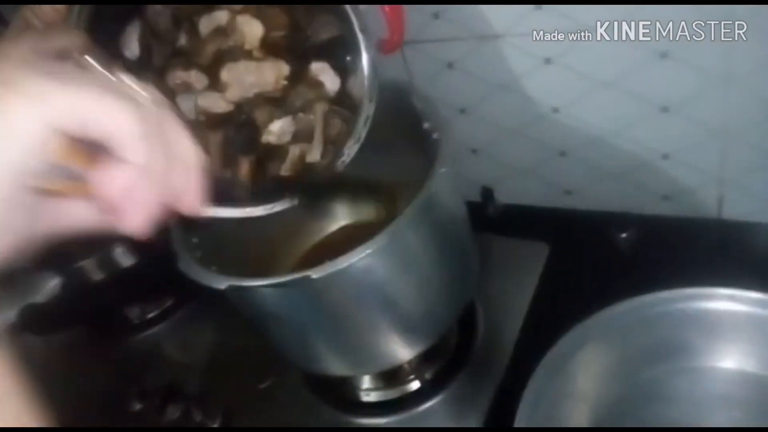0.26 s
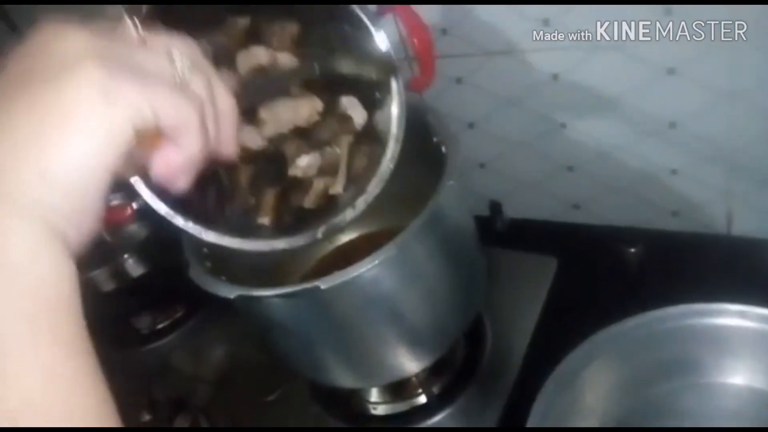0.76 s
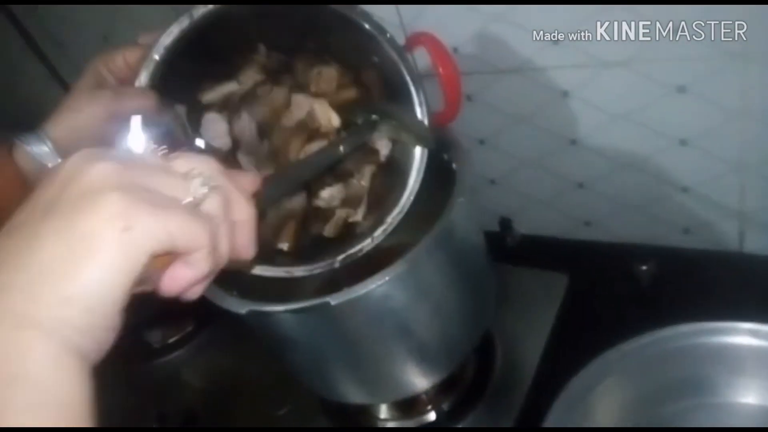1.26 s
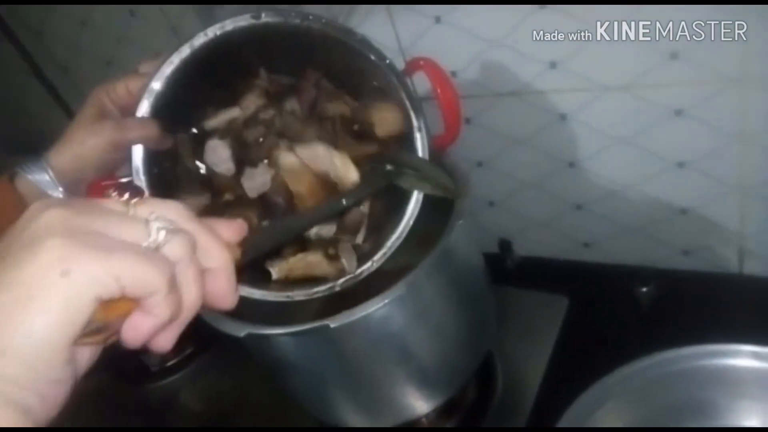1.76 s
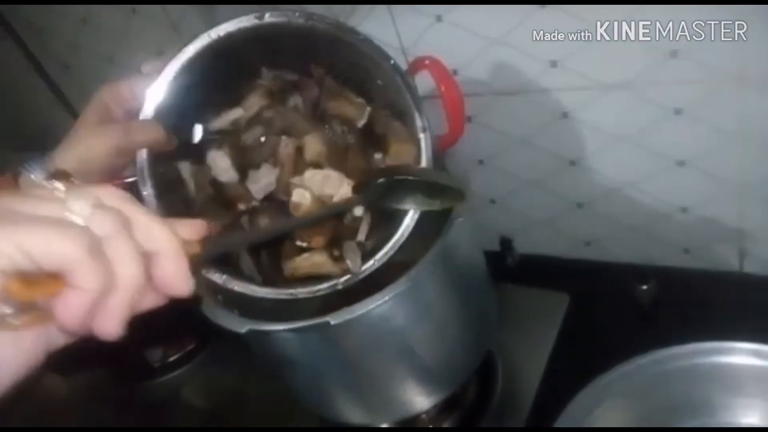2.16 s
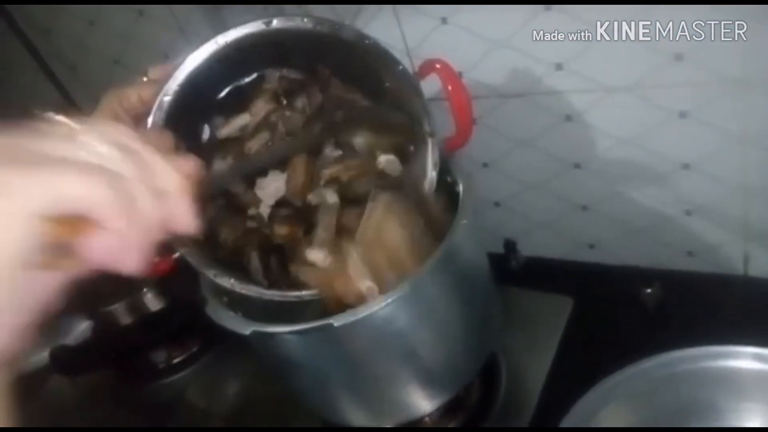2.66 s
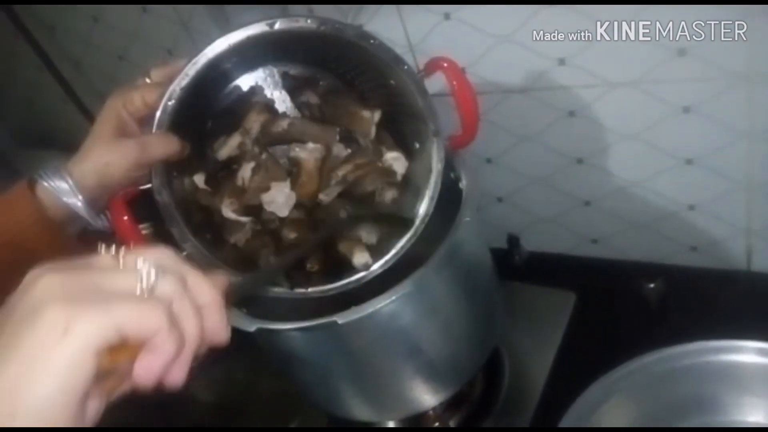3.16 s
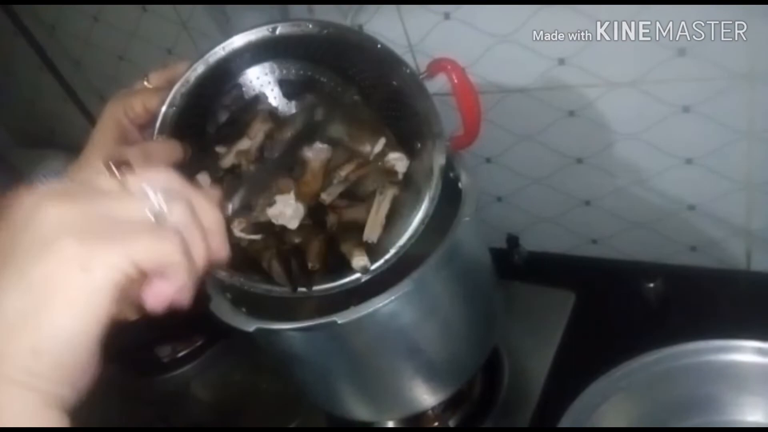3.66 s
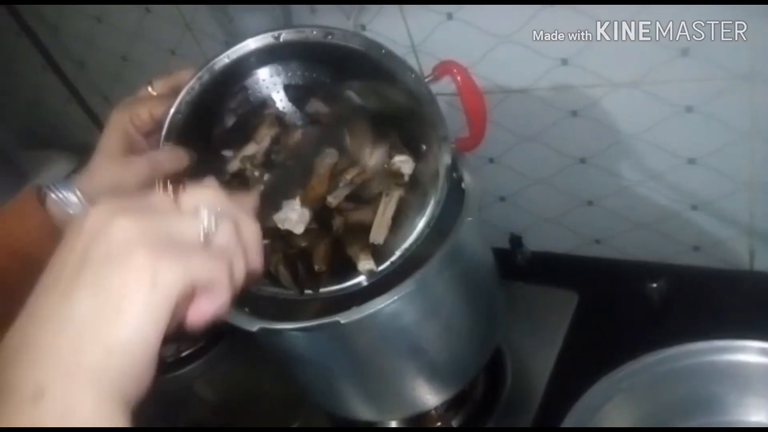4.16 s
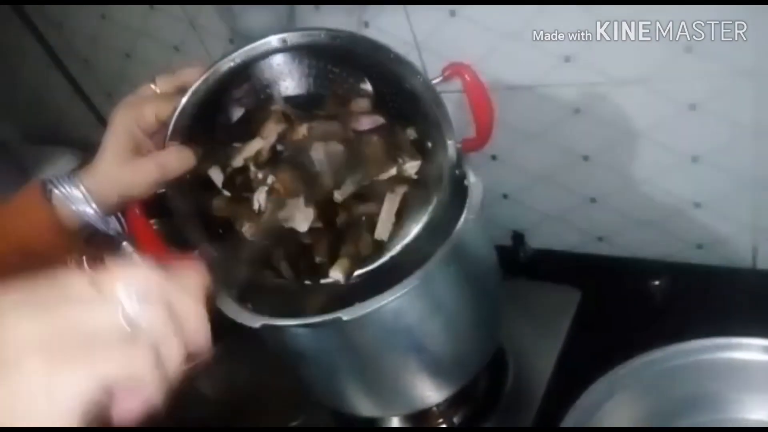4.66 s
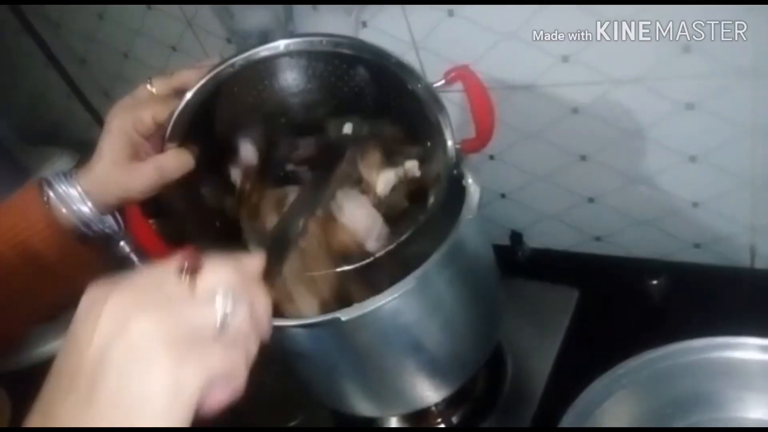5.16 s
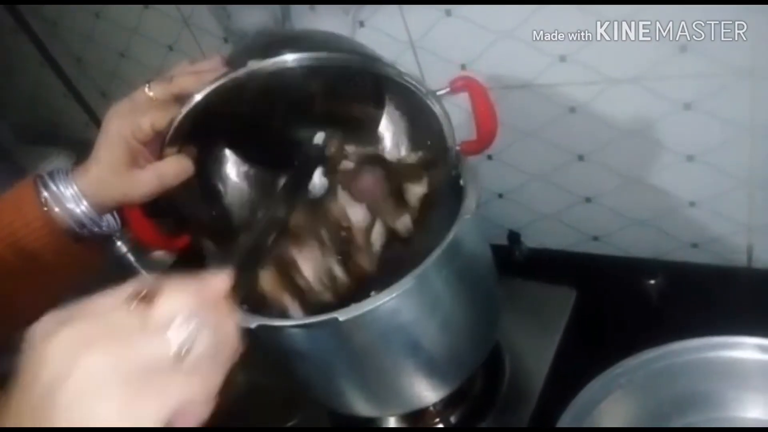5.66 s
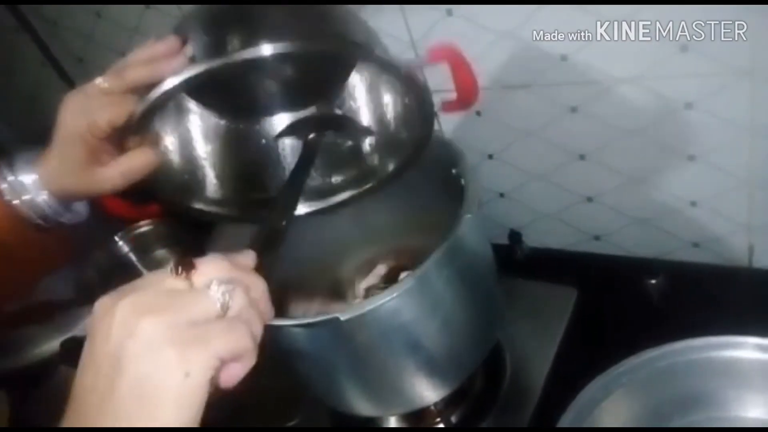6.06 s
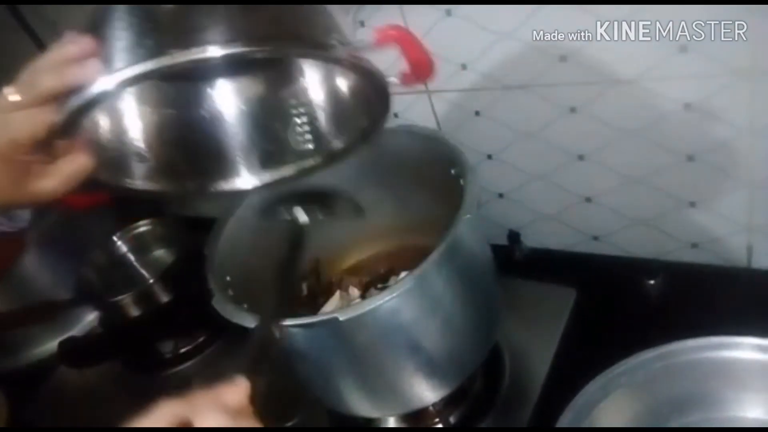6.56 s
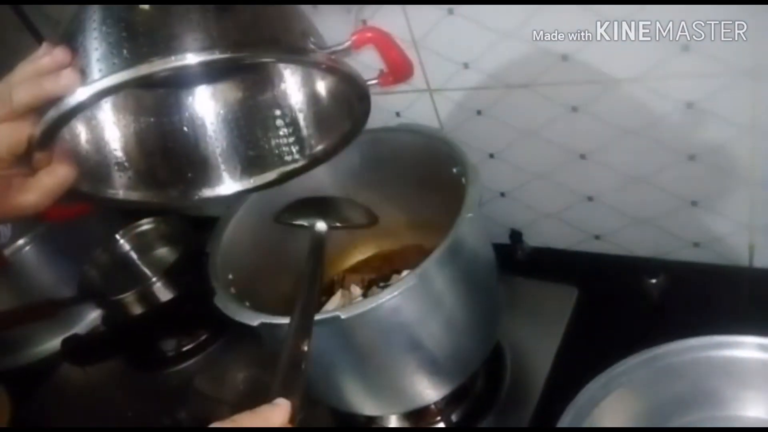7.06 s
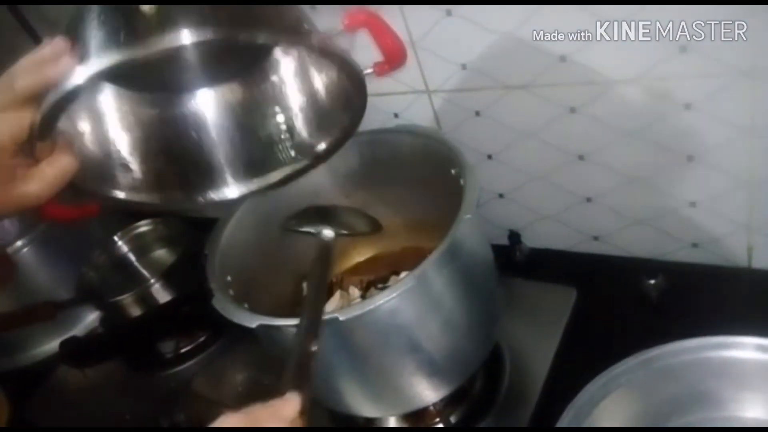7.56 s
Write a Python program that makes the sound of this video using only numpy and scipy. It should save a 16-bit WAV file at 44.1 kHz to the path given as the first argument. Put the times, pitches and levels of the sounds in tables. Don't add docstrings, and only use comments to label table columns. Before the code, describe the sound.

A small tiled kitchen, heard close through a modest microphone with light hiss; a low gas burner hum and very faint sizzle run throughout. At 0.25 s a hard bright ladle clank on the steel colander shimmers briefly, then a soft pot thud follows at 1.0. From 1.4 to 1.85 a dense flurry of knocks, rattle and scraping comes with hollow thumps as pieces drop. Light taps and quiet stirring follow around 2.0 to 2.6. A second burst at 2.7 to 3.2 booms low in the pot and ends with a clear ringing clang. Then mostly small wet ticks, with a dull thump at 3.9 and gentle stirring. From 4.9 activity returns; 5.15 to 5.55 is the longest tumble, clanging, ringing and thudding. A heavy dull thump lands at 5.87, smaller knocks last until 6.2, then faint stirring, ticks and hum to about 8 s.

```python
import sys
import numpy as np
from scipy import signal
from scipy.fft import rfft, irfft
from scipy.io import wavfile
from scipy.ndimage import uniform_filter1d

SR = 44100
rng = np.random.default_rng(int(sys.argv[2]) if len(sys.argv) > 2 else 0)


def persist_wave(psi):
    counts = np.round(np.clip(psi, -1, 1) * 32767).astype(np.int16)
    wavfile.write(sys.argv[1], SR, np.atleast_2d(counts).T)


def voltage_ratio(level):
    return 10 ** (np.asarray(level, float) / 20)


N = 343980

# f/Hz, level/dB, t60/s
LADLE_MODES = [(918, -9, .35), (1992, -2, .3), (2465, -7, .3), (3228, -2, .24), (4812, -3, .17),
               (5625, -9, .13), (6620, -9, .15), (7350, -18, .12), (8400, -24, .1), (10900, -28, .14)]
# f/Hz, level/dB, t60/s
COLANDER_MODES = [(765, -4, .3), (1160, -9, .2), (1435, -6, .17), (1618, -4, .22), (1730, -9, .2),
                  (2270, -12, .2), (2680, -11, .15), (2855, -8, .4), (2912, -4, .27), (3105, -9, .14),
                  (3718, -5, .3), (4265, -11, .4), (4490, -12, .25), (5035, -6, .2), (5200, -11, .2),
                  (5780, -11, .2), (6065, -8, .13), (6350, -12, .2), (7080, -14, .1)]
# f/Hz, left-right likeness
COHERENCE = [(40, 0.36), (150, 1), (400, 0.81), (1000, 1), (3000, 0.24), (10000, 0.064)]


def evened(x):
    return x / np.sqrt(np.mean(x ** 2) + 1e-20)


def read(points, hz):
    f, value = np.transpose(points)
    return np.interp(np.log(hz + 1), np.log(f + 1), value)


def add(mix, s, sound):
    part = mix[:, round(s * SR):][:, :sound.shape[1]]
    part += sound[:, :part.shape[1]]


def coloured(x, shape_db):
    count = x.shape[-1]
    gain = voltage_ratio(shape_db(np.fft.rfftfreq(count, 1 / SR)))
    return irfft(rfft(x, axis=-1) * gain, count, axis=-1)


def pair(count, same):
    a, b = rng.standard_normal((2, count))
    same = np.clip(same, 0, 1)
    return np.array([a, same * a + np.sqrt(1 - same ** 2) * b])


def strikes(rows, length, late_share, wall_db, soak, rough, weaker_db, contact_s):
    hz, db, t60 = np.transpose(sorted(LADLE_MODES + COLANDER_MODES))
    t, out = np.arange(16384) / SR, np.zeros((2, N))
    mode_waves = np.exp(2j * np.pi * hz[:, None] * t)
    rise = 1 - np.exp(-(t / contact_s) ** 1.5)
    for s, crack_db, tone_db, hz1, hz2 in rows:
        chance = rng.standard_normal((len(hz) + 2, 4))
        tones_hz, centre_hz = np.array([hz1, hz2]), np.sqrt(hz1 * hz2)
        nearest = hz[abs(np.log(hz / tones_hz[:, None])).argmin(1)]
        tones_hz = np.where(abs(nearest / tones_hz - 1) < .02, nearest, tones_hz)
        wall = db + crack_db + wall_db - 19.0 * abs(np.log2(hz / centre_hz)) + 1.4 * chance[2:, 0]
        level = voltage_ratio(np.r_[tone_db + 3, tone_db + 3 + weaker_db, wall])
        sides = level * np.exp(1j * (3 * chance[:, 1] + 0.62 * chance[:, 2:].T))
        all_t60 = length * np.r_[np.interp(tones_hz, hz, t60), t60][:, None]
        fall_db = -60 * t / all_t60
        clear = np.isin(tones_hz, [mode[0] for mode in LADLE_MODES[:5]])
        share = np.clip(rough, 0, 1) * np.where(clear, .4, 1)[:, None]
        slow_noise = rng.standard_normal((2, 96, 2)) @ [1, 1j]
        flutter = signal.resample(slow_noise, len(t), axis=1) / np.sqrt(2)
        tones = np.exp(2j * np.pi * tones_hz[:, None] * t) * (1 - share + share * flutter)
        first = voltage_ratio(-60 * (soak * fall_db / -60) ** 1.5)
        decay = first + late_share * voltage_ratio(fall_db)
        ring = (sides @ (np.r_[tones, mode_waves] * decay)).real * rise
        ring[:, :2048] += voltage_ratio(crack_db + 6.0) * crack(crack_db, tones_hz, chance) * np.sqrt(rise[:2048])
        add(out, s - .001, ring)
    return out


def crack(crack_db, tones_hz, chance):
    # f/Hz, level/dB per Hz
    crack_spectrum = [(300, -28.5), (700, 2), (2000, -6), (4000, -9.5), (6500, -4.5), (8200, -13.5),
                      (12000, -17), (15000, -20.5)]

    def shape_db(f):
        octaves = abs(np.log2((f + 1) / tones_hz[:, None])).min(0)
        bright = 0.58 * (crack_db + 32.5)
        uneven = 6 * np.sin(f / 450 + 4 * chance[0, 0]) + 2 * chance[1, 0] * (f / 4000 - 2)
        treble = (bright + uneven) * np.clip(f / 2000 - 3.3, 0, 1)
        return read(crack_spectrum, f) + treble - 4.9 * octaves + 5 * np.exp(-(octaves / 0.13) ** 2)

    t = np.arange(2048) / SR
    return evened(coloured(pair(2048, 0.13), shape_db)) * voltage_ratio(-60 * t / 0.092)


def knocks():
    # t/s, crack level/dB, tone level/dB, stronger tone f/Hz, weaker tone f/Hz
    hard = [(0.247, -21.5, -10.5, 6746, 5120), (0.248, -46, -18.5, 3087, 6053),
            (1.501, -24.5, -38.5, 6940, 3228), (1.502, -48, -30, 960, 1204),
            (1.592, -19, -19.5, 4878, 5250), (1.593, -26, -22, 1994, 2850), (1.627, -25, -12.5, 4730, 3190),
            (1.628, -34, -18, 4717, 5631), (1.699, -33, -32.5, 2020, 2835), (2.798, -28.5, -27, 1768, 2280),
            (2.808, -23.5, -26, 3731, 1744), (2.809, -26.5, -22.5, 6062, 2414),
            (2.849, -27, -30, 1750, 1397), (5.158, -32.5, -32, 6000, 4800), (5.159, -57, -32.5, 6380, 5330),
            (5.389, -36.5, -26.5, 2920, 3250), (5.437, -39, -46, 4930, 4100),
            (5.868, -30.5, -35, 664, 3860), (5.987, -36, -37, 5280, 10200),
            (6.142, -46.5, -46.5, 3228, 5630)]
    return strikes(hard, 0.84, 0.077, -13.5, soak=3.0, rough=0.56, weaker_db=-2.0, contact_s=0.0014)


def clangs():
    # t/s, crack level/dB, tone level/dB, stronger tone f/Hz, weaker tone f/Hz
    free = [(0.02, -53, -50, 2876, 3240), (0.754, -50, -51.5, 3246, 2920),
            (1.417, -59.5, -42.5, 3240, 4820), (1.825, -31, -26.5, 2873, 4820),
            (1.826, -36.5, -32, 792, 3110), (2.671, -59.5, -58, 3260, 843), (2.714, -26.5, -19, 1440, 1620),
            (2.715, -31, -24, 4705, 2927), (3.105, -46.5, -43.5, 3220, 3070),
            (3.129, -34.5, -25.5, 2044, 941), (3.13, -33.5, -32, 3240, 2450),
            (3.177, -34.5, -33.5, 3250, 914), (4.896, -49, -43.5, 6750, 5330),
            (5.265, -23.5, -19, 1992, 4700), (5.266, -41, -22, 1621, 3214), (5.36, -33, -25, 2907, 3214),
            (5.355, -29, -44, 2170, 1637), (5.494, -24.5, -36, 3740, 3100), (5.498, -34, -30.5, 2859, 1970)]
    return strikes(free, 0.81, 0.038, -1.5, soak=2.9, rough=0.35, weaker_db=-4.5, contact_s=0.00061)


def light_taps():
    # t/s, tone level/dB, stronger tone f/Hz, weaker tone f/Hz
    light = [(0.186, -37.5, 798, 660), (0.636, -49.5, 853, 3260), (1.021, -45, 1165, 3754),
             (1.472, -37, 5710, 985), (2.251, -43.5, 834, 920), (2.985, -49, 2560, 2030),
             (1.283, -60, 4480, 4090), (3.059, -43.5, 3718, 1010), (3.527, -55, 827, 3335),
             (5.943, -37.5, 673, 871), (0.291, -50, 675, 765), (3.905, -39.5, 743, 3170),
             (4.51, -53, 3530, 3045), (5.819, -44.5, 1724, 1448), (5.837, -44.5, 5800, 1390),
             (6.165, -47, 1286, 638), (6.405, -55.5, 9060, 4540)]
    rows = [(s, db - 4, db, *hz) for s, db, *hz in light]
    return strikes(rows, 0.63, 0.29, 0.51, soak=1.8, rough=0.6, weaker_db=-7.5, contact_s=0.0051)


def chimes():
    # t/s, tone level/dB, stronger tone f/Hz, weaker tone f/Hz
    lasting = [
        (3.13, -29, 1992, 765),
        (1.63, -36, 3718, 2912),
        (1.827, -41, 2855, 5625),
        (2.716, -31, 765, 3718),
        (3.131, -31, 2465, 1618),
        (4.898, -56, 4265, 918),
        (5.497, -35, 3718, 2912),
        (5.266, -26, 3718, 2465),
        (5.361, -31, 3228, 1992),
    ]
    rows = [(s, db - 12, db, *hz) for s, db, *hz in lasting]
    return strikes(rows, 1.05, .7, -12, soak=5.9, rough=.1, weaker_db=-2.5, contact_s=.002)


def rings(modes, seconds):
    hz, db, t60 = np.transpose(modes)[:, :, None]
    t = np.arange(round(seconds * SR)) / SR
    apart = rng.standard_normal((2, *hz.shape)) * np.clip(hz / 900, 0, .6)
    phase = rng.uniform(0, 2 * np.pi, hz.shape) + apart
    return (voltage_ratio(db - 60 * t / t60) * np.sin(2 * np.pi * hz * t + phase)).sum(1)


def contacts(per_s, spread_db):
    size = voltage_ratio(spread_db * np.minimum(rng.exponential(1, N), 4)) * rng.choice([-1., 1.], N)
    return size * (rng.random(N) < per_s / SR)


def shaken(make_body, per_s, spread_db):
    out = np.zeros((2, N))
    for place in range(4):
        body = make_body()
        count = body.shape[1]
        faded = body * signal.windows.tukey(2 * count, .6)[count:]
        out += signal.oaconvolve(contacts(per_s / 4, spread_db)[None], faded, axes=1)[:, :N]
    return evened(out)


def swells(s, hold_s, db, rise, sag, fall):
    late = np.arange(0, N + 32, 32) / SR - s[:, None]
    held = np.clip(late, 0, np.maximum(hold_s, 0)[:, None])
    level_db = db[:, None] + rise * np.minimum(late, 0) - sag * held - fall * np.maximum(late - held, 0)
    gain = np.sqrt((voltage_ratio(level_db) ** 2).sum(0))
    return np.interp(np.arange(N) / 32, np.arange(len(gain)), gain)


def landings():
    # t/s, hold/s, level/dB
    falls = [(0.306, 0.057, -41.5), (0.957, 0, -45.5), (1.046, 0.0014, -38), (1.495, 0.024, -32),
             (1.696, 0.16, -35), (1.833, 0.013, -39), (2.262, 0.0038, -42.5), (2.747, 0.1, -35.5),
             (2.83, 0.14, -30.5), (3.083, 0.025, -35.5), (3.129, 0.077, -35), (3.924, 0.081, -41.5),
             (4.927, 0.11, -58), (5.186, 0.044, -42), (5.326, 0.28, -29.5), (5.879, 0.0028, -23.5),
             (5.966, 0.059, -35), (6.137, 0.077, -42)]
    # f/Hz, level/dB, t60/s
    pot_modes = [(130, -9, 0.089), (185, -1, 0.096), (218.6, -3.5, 0.1), (304.4, -9.5, 0.14),
                 (350.7, -7.5, 0.17), (407, -6.5, 0.093), (639, -9, 0.1)]
    soft_push = signal.windows.hann(45)
    thump = shaken(lambda: signal.oaconvolve(rings(pot_modes, 0.065), soft_push[None]), 800, 2.5)
    thump = coloured(thump, lambda f: -20 * np.log10(1 + (55 / (f + 1)) ** 2))
    return voltage_ratio(-3.5) * swells(*np.transpose(falls), rise=400, sag=41.3, fall=195) * thump


def slides():
    # t/s, hold/s, rattle level/dB, scrape above rattle/dB
    sliding_rows = [(0.256, 0.038, -54, 24.5), (0.304, 0.0031, -32.5, 5), (1.415, 0.031, -39.5, -21),
                    (1.512, 0, -26.5, -10.5), (1.633, 0.17, -37, 6), (1.83, 0.026, -35.5, -60),
                    (2.74, 0.063, -36, -9), (2.828, 0.11, -26.5, -6), (3.134, 0.015, -24, -40),
                    (3.901, 0.0049, -42, -3), (4.896, 0.07, -48, -7.5), (5.182, 0.026, -37, -7),
                    (5.282, 0.029, -25.5, 2), (5.342, 0.36, -28.5, -30), (5.859, 0.11, -32, -15),
                    (6.158, 0, -44.5, 1.5)]
    # t/s, hold/s, level/dB
    stirring = [
        (2.026, 0.21, -62.5),
        (2.575, 0.17, -68.5),
        (4.2, 0.31, -68.5),
        (4.491, .12, -65),
        (6.413, 0.2, -63.5),
        (6.927, 0.5, -71.5),
    ]
    # f/Hz, level/dB per Hz
    scrape_spectrum = [(240, -36.5), (500, 1), (1500, -9.5), (3000, -1.5), (5000, 0.5), (6500, -2.5),
                       (8200, -5), (12000, -9), (15000, -18)]
    s, hold_s, rattle_db, gritty_db = np.transpose(sliding_rows)
    sliding = swells(s, hold_s, rattle_db, rise=660, sag=38.5, fall=310)
    scraping = swells(s, hold_s, rattle_db + gritty_db, rise=1300, sag=61, fall=550)
    steel_modes = COLANDER_MODES + LADLE_MODES
    low_wall = [(hz, db - 5 * hz / 1000, t60) for hz, db, t60 in steel_modes]
    rattle = shaken(lambda: rings(low_wall, 0.01), per_s=720, spread_db=1.5)

    fade = voltage_ratio(-60 * np.arange(900) / SR / 0.0096)

    def grain():
        return coloured(pair(4096, 0.24), lambda f: read(scrape_spectrum, f))[:, :900] * fade

    grit = shaken(grain, per_s=1600, spread_db=2.5)
    band = coloured(grit, lambda f: -11 * np.log2((f + 1) / 3900) ** 2)
    rustle = swells(*np.transpose(stirring), rise=250, sag=17, fall=230) * evened(band)
    hz, db, t60 = np.transpose(steel_modes)[:, :, None]
    t = np.arange(9000) / SR
    fall = voltage_ratio(db / 2 - 6.3 * abs(np.log2(hz / 5600)) - 60 * t / t60)
    steel = (fall * np.sin(2 * np.pi * hz * t)).sum(0)
    singing = signal.oaconvolve(scraping * grit, steel[None] / np.linalg.norm(steel), axes=1)[:, :N]
    scrape = voltage_ratio(-3.0) * scraping * grit + voltage_ratio(-16.0) * singing
    return voltage_ratio(-9.5) * sliding * rattle + scrape + voltage_ratio(-2.5) * rustle


def singles(rows):
    t, out = np.arange(9000) / SR, np.zeros((2, N))
    for (s, db, hz, t60), chance in zip(rows, rng.standard_normal((len(rows), 4))):
        apart = np.clip(hz / 2500, .1, .6) * chance[0] * np.array([[1], [-1]])
        near_hz = hz + (22 + 0.008 * hz) * chance[1]
        tone = np.sin(2 * np.pi * hz * t + apart)
        tone += .5 * np.sin(2 * np.pi * near_hz * t + 3 * chance[2] - apart)
        click = evened(coloured(pair(1024, 0.32), lambda f: -9 * np.log2((f + 1) / hz) ** 2))
        tone[:, :1024] += voltage_ratio(-0.5 - 60 * t[:1024] / 0.036) * click
        rise_s = 0.0013 + 0.3536 / hz
        add(out, s, voltage_ratio(db + 1.0 - 60 * t / (0.87 * t60)) * (1 - np.exp(-t / rise_s)) * tone)
    return out


def thuds():
    # t/s, peak level/dB, f/Hz, t60/s
    booms = [(0, -52.5, 303, .2), (.121, -44.5, 151, 0.21), (.198, -46, 372, 0.12), (.255, -48, 121, .4),
             (.261, -46, 215, 0.18), (.285, -36.5, 377, 0.21), (.638, -50, 130, 0.26),
             (.755, -47.5, 341, 0.21), (.951, -44.5, 132, 0.25), (1.022, -29.5, 198.4, 0.15),
             (1.03, -40.5, 394, 0.29), (1.06, -32.5, 205, 0.15), (1.42, -41, 321, 0.09),
             (1.468, -34, 206, 0.14), (1.48, -41, 402, 0.34), (1.508, -33, 210, 0.11),
             (1.51, -33, 409, 0.21), (1.63, -39, 404, 0.26), (1.69, -34, 282.4, 0.15),
             (1.733, -24.5, 205.6, 0.14), (1.78, -32.5, 230, 0.12), (2.252, -43, 220, 0.24),
             (2.735, -34, 183.5, 0.16), (2.74, -32, 407, 0.14), (2.812, -23, 184.6, 0.29),
             (2.82, -30, 293, 0.29), (2.83, -35, 123, 0.74), (2.865, -27, 228, 0.14),
             (2.905, -31, 225, 0.12), (2.96, -35, 224, 0.36), (2.97, -40.5, 411.4, 0.19),
             (3.06, -33.5, 183, 0.3), (3.12, -38, 205, 0.14), (3.2, -48.5, 176, 0.46),
             (3.909, -33, 183, 0.16), (4.821, -51.5, 200, .2), (4.921, -44, 182, 0.28),
             (5.177, -43.5, 203, 0.45), (5.307, -29.5, 206.7, 0.6), (5.398, -24, 201, 0.21),
             (5.44, -32.5, 180, 0.29), (5.491, -32, 208, 0.1), (5.5, -34.5, 334, 0.3),
             (5.849, -43, 222, 0.24), (5.866, -22.5, 176, 0.25), (5.875, -35, 332, 0.19),
             (5.93, -47, 189, 0.2), (6.0, -31.5, 215.4, 0.2), (6.139, -42, 221, 0.81),
             (6.423, -47, 135, .2)]
    return singles(booms)


def pings():
    # t/s, peak level/dB, f/Hz, t60/s
    spots = [(0, -44.5, 4860, 0.16), (0, -49.5, 3690, 0.15), (.205, -53.5, 3217, 0.2),
             (.252, -30.5, 1383, 0.12), (.252, -39, 724, 0.36), (.636, -56, 3236, .15),
             (1.02, -48.5, 1947, 0.17), (1.417, -45, 3214, 0.19), (1.485, -48.5, 3130, 0.11),
             (1.502, -29, 1433, 0.095), (1.508, -27.5, 4820, 0.092), (1.51, -19.5, 748, 0.065),
             (1.512, -32, 3150, 0.12), (1.594, -22.5, 1197, 0.06), (1.594, -34.5, 1636, 0.43),
             (1.6, -34, 761, 0.28), (1.66, -38.5, 5640, 0.13), (.756, -48.5, 4820, 0.11),
             (2.252, -47, 2840, 0.24), (2.252, -48.5, 3690, 0.18), (2.254, -41, 1435, 0.18),
             (2.884, -35, 1720, 0.054), (.754, -45.5, 3240, 0.19), (5.5, -55, 2912, 0.36),
             (2.937, -26, 1770, 0.051), (2.938, -37, 6000, 0.034), (3.102, -53, 2960, .12),
             (3.135, -37, 1610, 0.26), (3.14, -41.5, 770, 0.39), (3.177, -41.5, 4820, 0.14),
             (3.177, -41, 5670, 0.14), (3.2, -38.5, 922, 0.2), (5.158, -43, 2350, 0.092),
             (5.16, -45, 900, 0.4), (5.2, -37, 1457, 0.13), (5.243, -36, 2220, 0.039),
             (5.268, -31, 765, 0.38), (5.268, -29, 1654, 0.7), (5.345, -21.5, 2976, 0.11),
             (6.95, -60, 610, 1), (5.54, -63, 6460, 0.068), (5.882, -42.5, 2946, 0.21),
             (5.88, -47.5, 3210, 0.16), (6.085, -51.5, 1840, 0.12), (1.022, -47.5, 3250, 0.18),
             (1.026, -57.5, 3770, 0.18), (7.108, -50.5, 2565, 0.09), (7.11, -52.5, 1830, 0.15),
             (1.022, -55, 4790, .12), (7.69, -65.5, 1830, 0.31)]
    return singles(spots)


def ticks():
    # t/s, level/dB, f/Hz
    wet = [(0.6015, -39.5, 1760), (2.4794, -44.5, 1570), (3.5594, -45, 2370), (3.7763, -43, 1475),
           (3.9719, -39, 1146), (4.0497, -47, 2170), (4.1375, -44.5, 2040), (4.2378, -41.5, 2274),
           (4.3186, -46, 2300), (4.4094, -49.5, 3900), (6.4014, -46, 1340), (6.5175, -53, 4700),
           (6.9494, -48.5, 1840), (7.2, -55.5, 4540), (7.6894, -45.5, 1370),
           (0.119, -47, 4600),
        (2.5987, -50, 5700),
        (6.685, -49.5, 4310),
        (7.552, -47.5, 2910),
    ]
    t, out = np.arange(2500) / SR, np.zeros((2, N))
    when, size, pitch = rng.random((420, 3)).T
    faint = zip(when * N / SR, -60 - 4 * np.log(size + .08), 800 * 5.5 ** pitch ** 1.6)
    for s, db, hz in [*wet, *faint]:
        fuzz = evened(coloured(pair(len(t), .6), lambda f: -13 * np.log10(1 + ((f - hz) / 140) ** 2)))
        add(out, s, voltage_ratio(db - 3.5 - 60 * t / 0.061) * (1 - np.exp(-t / 0.004)) * fuzz)
    return out


def shimmers():
    # t/s, level/dB, f/Hz, t60/s
    shifts = [(.25, -37, 6000, 0.58), (.25, -42, 6620, .4), (.25, -35, 5100, .45), (.25, -37.5, 2950, 0.45),
              (.755, -45.5, 970, 0.3), (.945, -49.5, 1885, .08), (1.02, -39, 1250, 0.13),
              (1.03, -41, 850, 0.25), (2.195, -52, 1680, 0.12), (2.237, -42, 1900, .06),
              (2.237, -50.5, 2900, 0.061), (2.252, -40.5, 850, 0.19), (2.35, -53.5, 1700, 0.13),
              (2.375, -59.5, 3340, 0.087), (2.465, -54.5, 747.5, 0.22), (2.895, -40, 7200, 0.075),
              (6.15, -51, 608, .3)]
    t, out = np.arange(16384) / SR, np.zeros((2, N))
    for s, db, hz, t60 in shifts:
        width_hz = 120 + 0.01504 * hz
        fuzz = coloured(pair(len(t), .5), lambda f: -20 * np.log10(1 + ((f - hz) / width_hz) ** 2))
        add(out, s, voltage_ratio(db - 60 * t / t60) * (1 - np.exp(-t / 0.001)) * evened(fuzz))
    return out


def kitchen(x):
    # f/Hz, t60/s
    room_t60 = [(150, 0.23), (600, 0.41), (2000, 0.45), (5000, 0.31), (9000, 0.28)]
    out, t_s = np.zeros((2, N)), np.arange(N) / SR
    for k in range(3):
        echoes = np.zeros((2, SR // 2))
        start = np.arange(200, SR // 2 - 20, 20)
        at = start + rng.integers(0, 20, (2, len(start)))
        np.put_along_axis(echoes, at, rng.choice([-1., 1.], at.shape), 1)
        hz, t, z = signal.stft(echoes, SR, nperseg=256)
        same = np.clip(read(COHERENCE, hz), 0, 1)[:, None]
        z[1] = same * z[0] + np.sqrt(1 - same ** 2) * z[1]
        tail = signal.istft(z * voltage_ratio(-60 * t / read(room_t60, hz)[:, None]), SR, nperseg=256)[1]
        share = np.sqrt(2 / 3) * np.cos(np.pi * (3 * t_s + k / 3))
        sent = (x.mean(0) * share)[None]
        out += signal.fftconvolve(sent, tail / np.linalg.norm(tail[0]), axes=1)[:, :N]
    return out


def stove():
    # f/Hz, level/dB per Hz
    hum_spectrum = [(20, -23), (43, -27), (75, 3.5), (106, 1.5), (408, -1.5), (521, -16), (603, -7),
                    (716, -19.5), (893, -14.5), (1010, -14.5), (3520, -19), (7000, -26.5), (9100, -58.5),
                    (15400, -120)]
    # f/Hz, width/Hz, level/dB
    hum_bands = [(620, 22, -78), (884, 150, -67), (1440, 250, -68.5), (1830, 210, -71)]
    frames, hz = N // 256 + 5, np.fft.rfftfreq(1024, 1 / SR)
    a, b, c, d, patches = rng.standard_normal((frames, 513, 5)).T
    patches = uniform_filter1d(uniform_filter1d(patches, size=10, axis=0), size=12, axis=1)
    swell = evened(uniform_filter1d(rng.standard_normal(frames), size=40))
    same, left = np.clip(read(COHERENCE, hz), -1, 1)[:, None], a + 1j * b
    z = np.array([left, same * left + np.sqrt(1 - same ** 2) * (c + 1j * d)])
    drift_db = 3.6 * np.clip(hz / 1200, .3, 1)[:, None] * evened(patches) + 0.38 * swell
    z *= voltage_ratio(read(hum_spectrum, hz)[:, None] + drift_db)
    hum = voltage_ratio(-57.5) * evened(signal.istft(z, nperseg=1024, noverlap=768)[1][:, :N])
    for centre_hz, width_hz, db in hum_bands:
        band = coloured(pair(N, 0.98), lambda f: -20 * np.log10(1 + (2 * (f - centre_hz) / width_hz) ** 2))
        hum += voltage_ratio(db) * evened(band)
    bubbles = np.array([contacts(57, 11.0), contacts(60, 3.2)])
    sizzle = coloured(bubbles, lambda f: -7 * np.log2((f + 1) / 2500) ** 2)
    return hum + voltage_ratio(-75) * evened(sizzle + 1.3 * sizzle[::-1])


def scene():
    # f/Hz, left over right/dB
    left_over_right = [(60, -0.5), (240, 2), (950, 1.5), (3770, 2), (15000, -2.5)]
    near = knocks() + light_taps() + clangs() + chimes()
    near += ticks() + landings() + slides() + thuds() + pings()
    far = voltage_ratio(-6.5) * kitchen(near) + stove()
    near += shimmers()
    left = np.roll(near[0], 2) + np.roll(far[0], 7)
    right = near[1] + far[1]
    return np.array([coloured(left, lambda f: read(left_over_right, f) / 2),
                     coloured(right, lambda f: -read(left_over_right, f) / 2)])


def roll_off(x):
    return signal.sosfilt(signal.butter(12, 16640, fs=SR, output="sos"), x)


def record(dry):
    # f/Hz, level/dB per Hz
    hiss_spectrum = [(300, -20.5), (3000, -6.5), (7000, -0.5), (10900, 2), (13500, -8), (14900, 5),
                     (15600, -5.5)]
    # f/Hz, level/dB
    response = [(20, -10.5), (60, -3), (200, -3), (6500, -0.85), (7400, -5), (8200, -9), (13500, -11.5),
                (15000, -7.5), (15700, -15.5), (16300, -47.5)]
    hiss = voltage_ratio(-69) * evened(coloured(pair(N, 0.21), lambda f: read(hiss_spectrum, f)))
    return roll_off(coloured(dry + hiss, lambda f: read(response, f)))


dry = scene()
out = record(dry)
persist_wave(out)
```